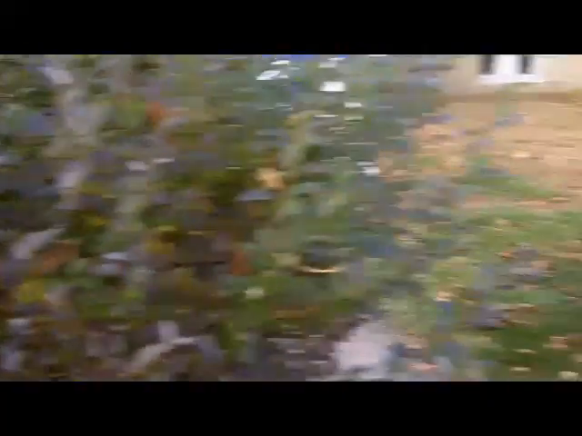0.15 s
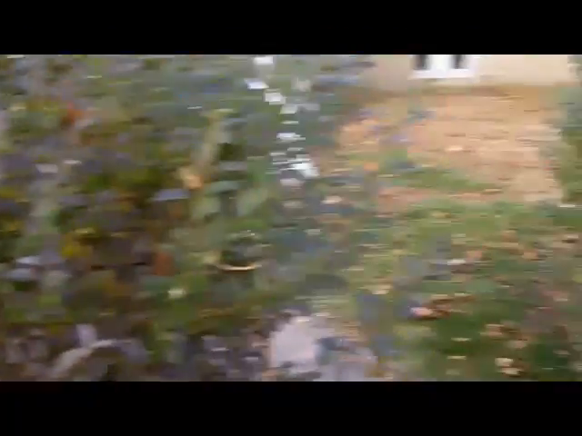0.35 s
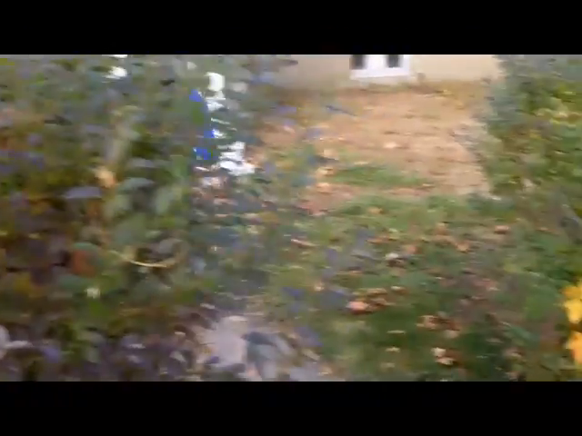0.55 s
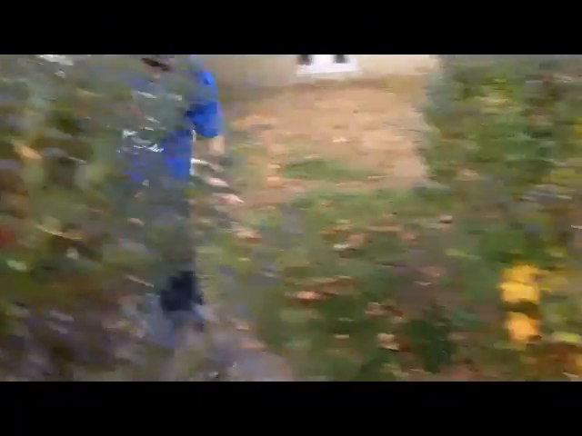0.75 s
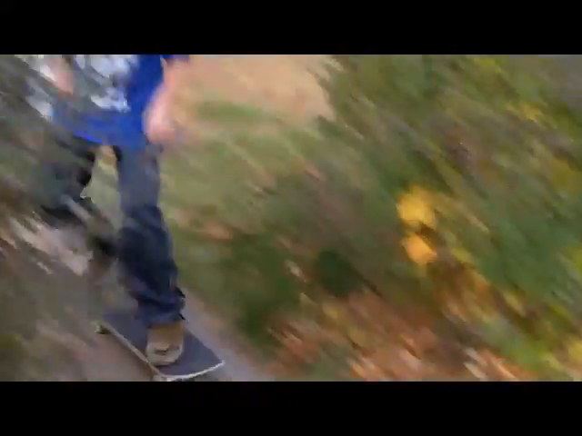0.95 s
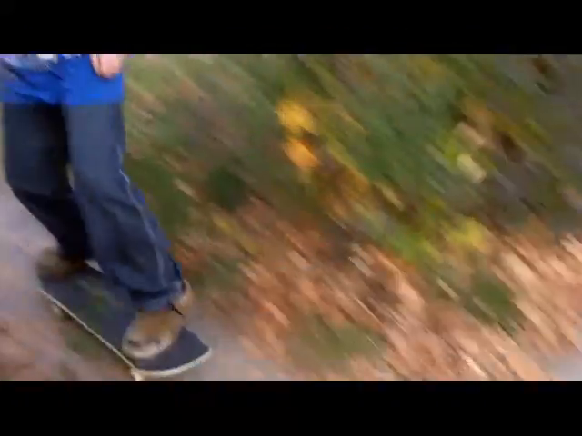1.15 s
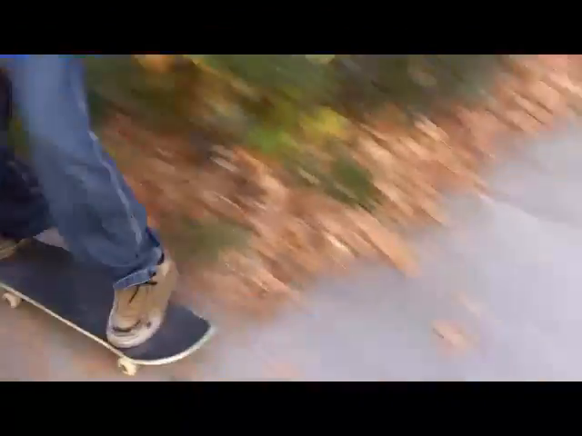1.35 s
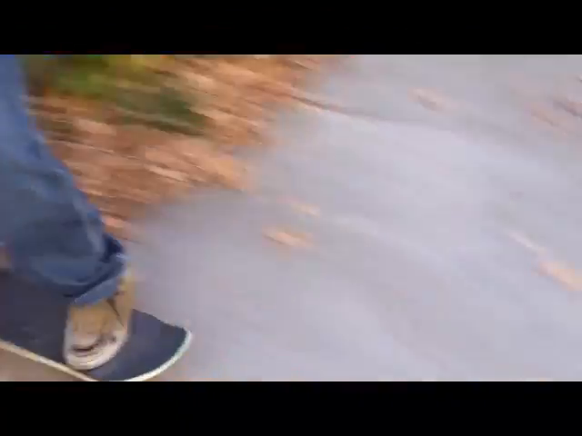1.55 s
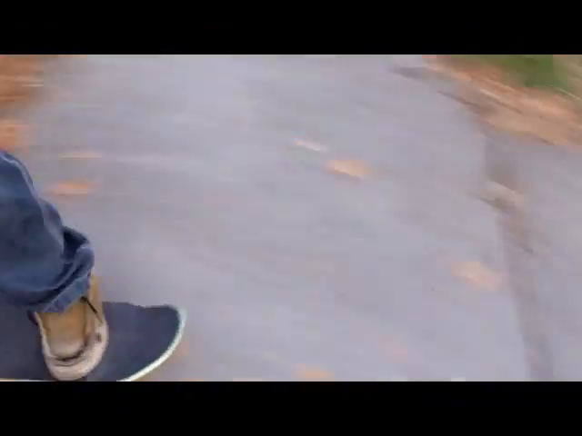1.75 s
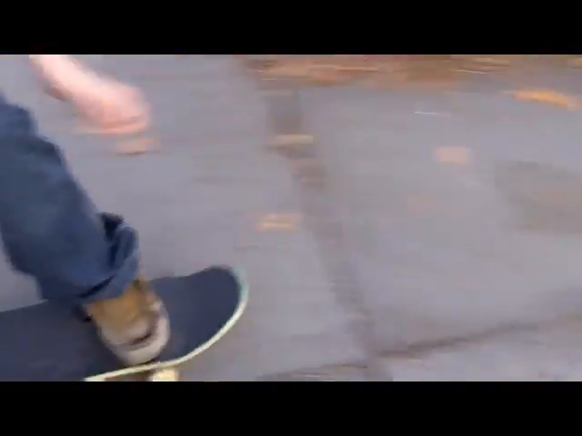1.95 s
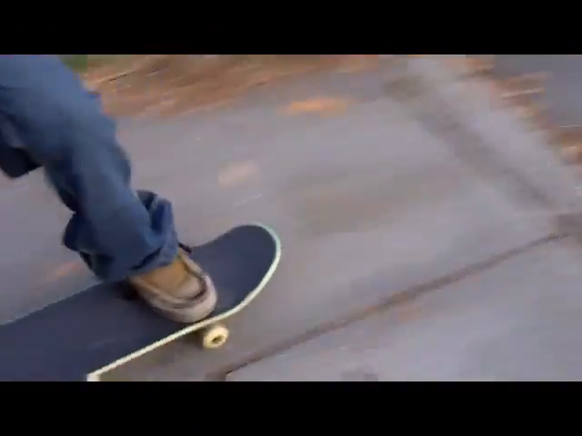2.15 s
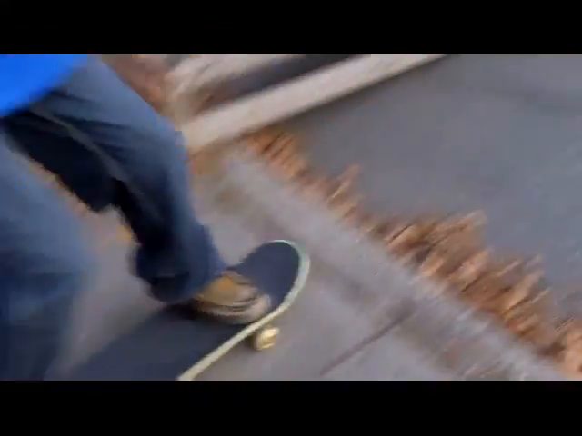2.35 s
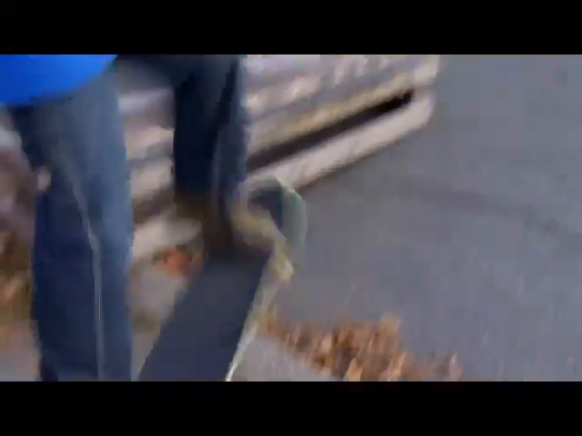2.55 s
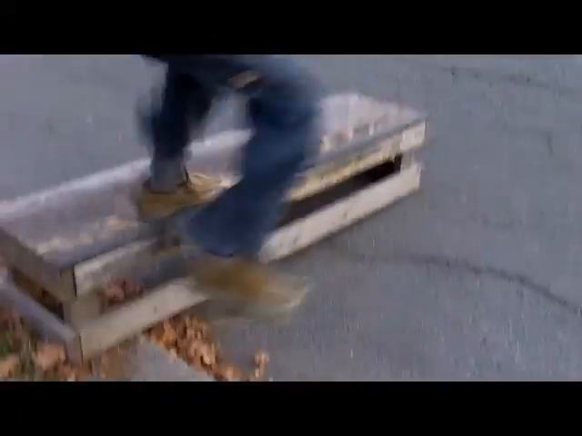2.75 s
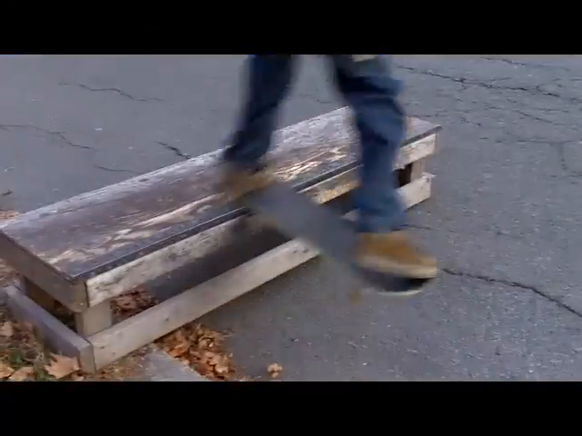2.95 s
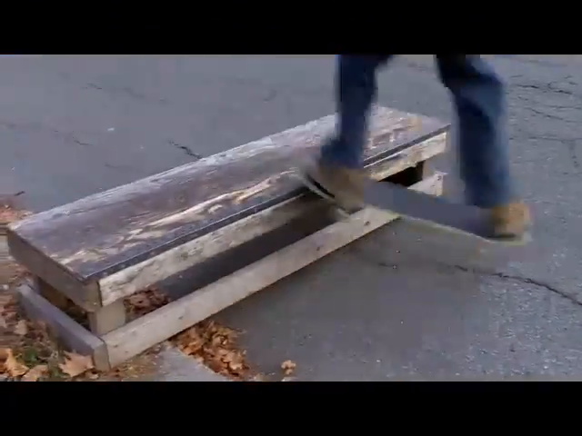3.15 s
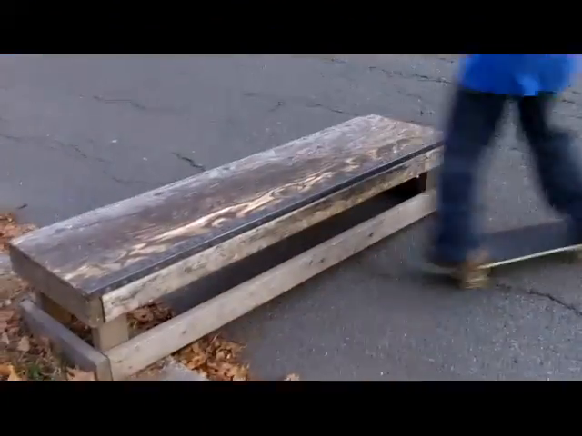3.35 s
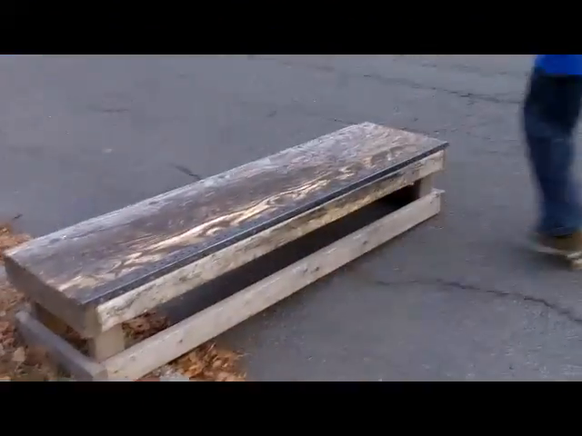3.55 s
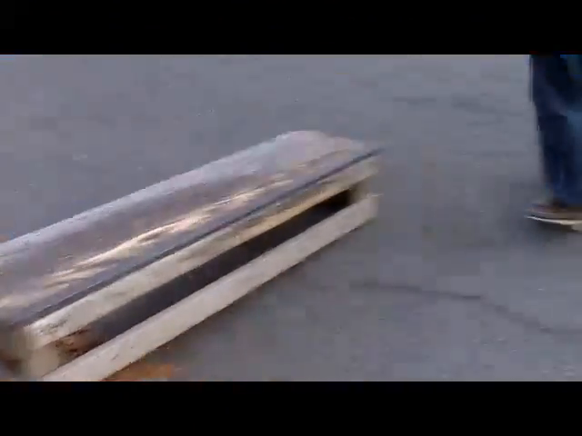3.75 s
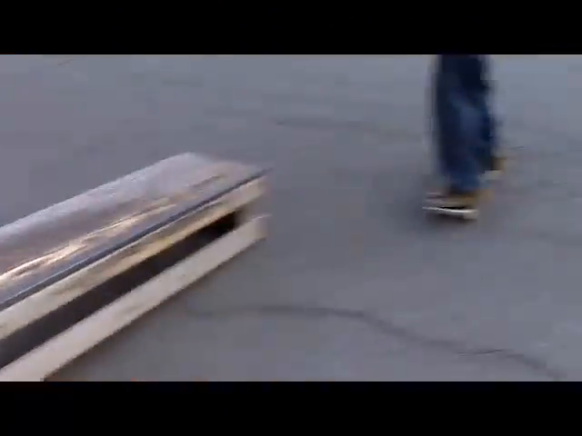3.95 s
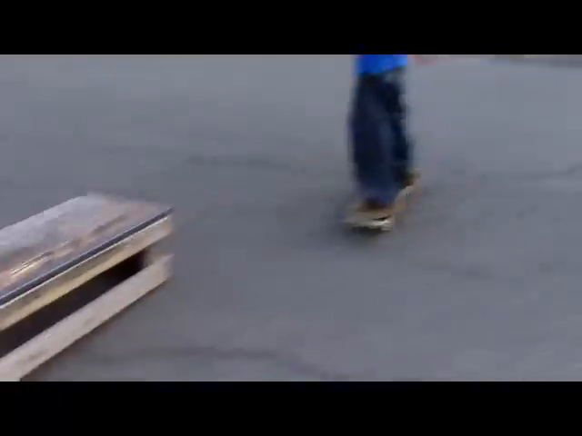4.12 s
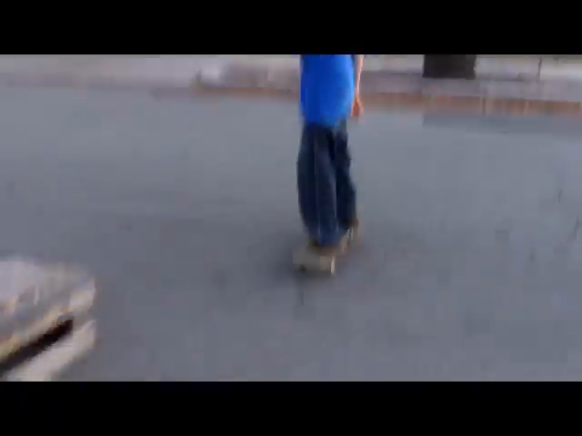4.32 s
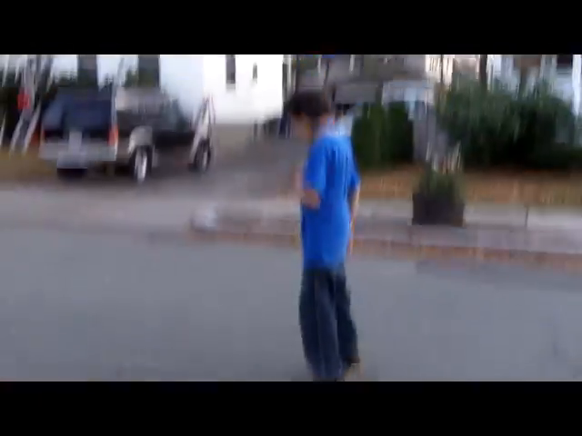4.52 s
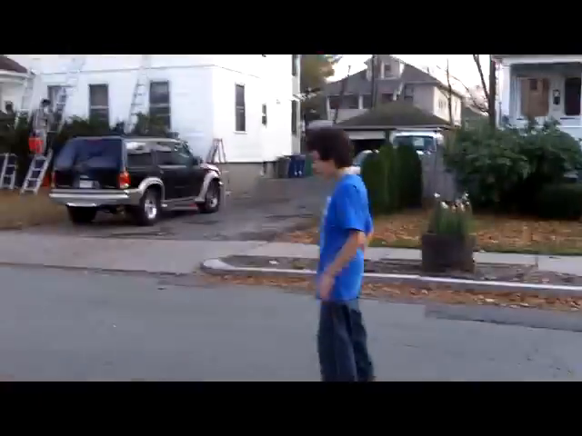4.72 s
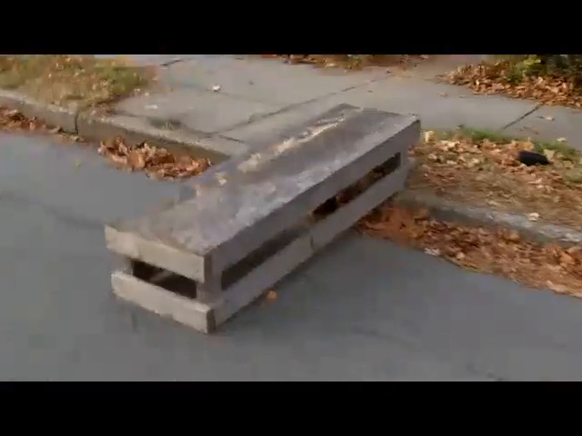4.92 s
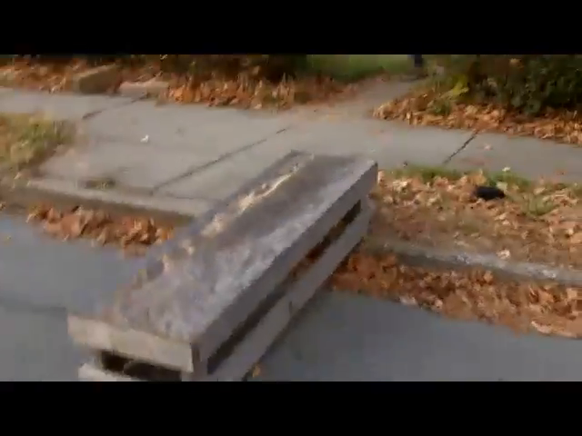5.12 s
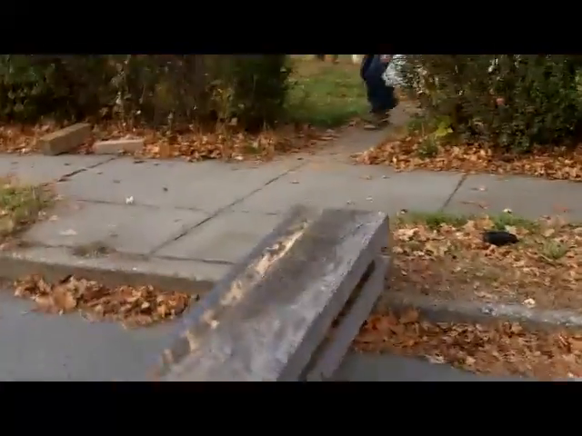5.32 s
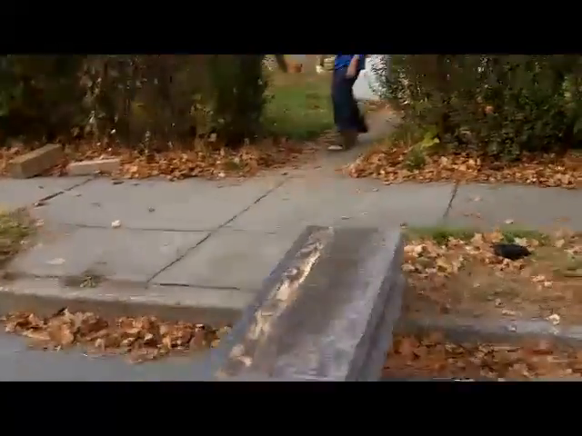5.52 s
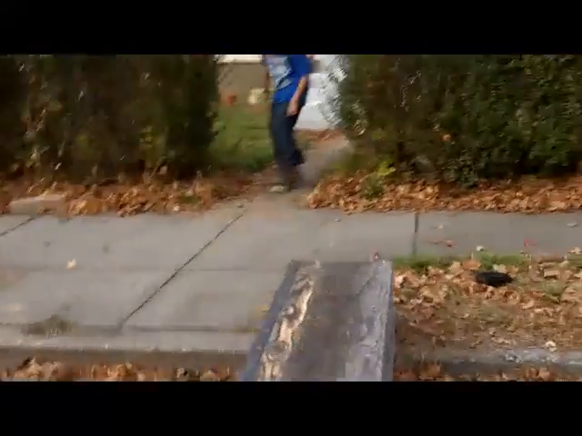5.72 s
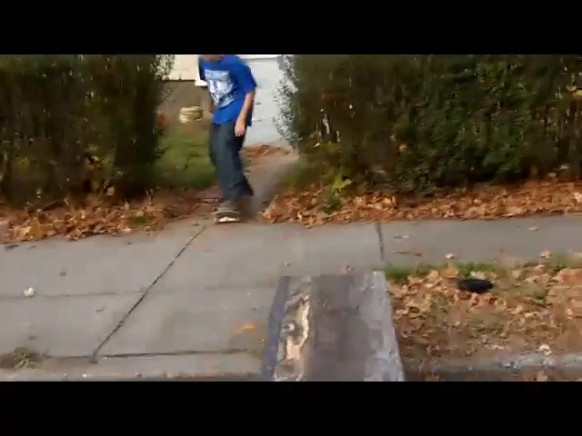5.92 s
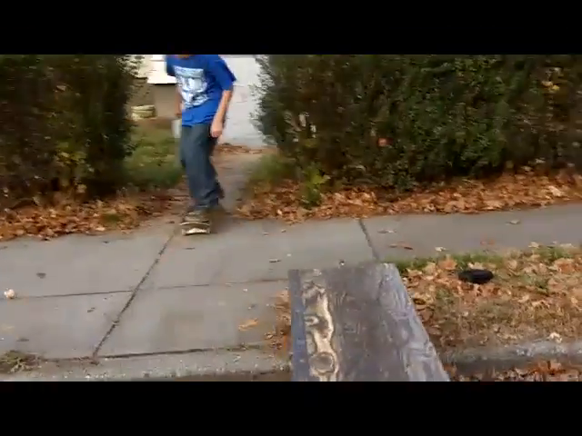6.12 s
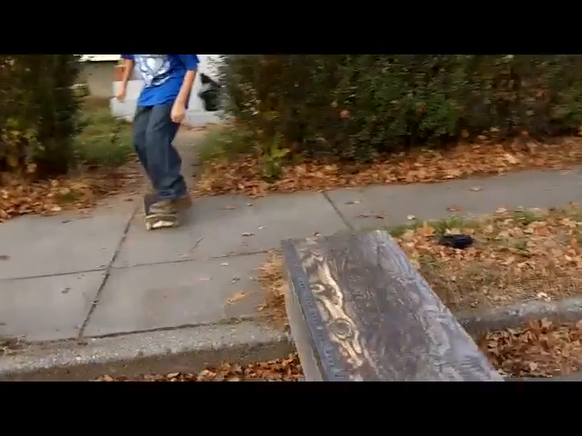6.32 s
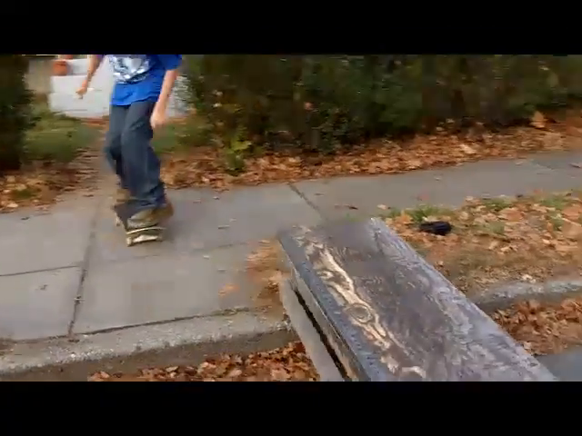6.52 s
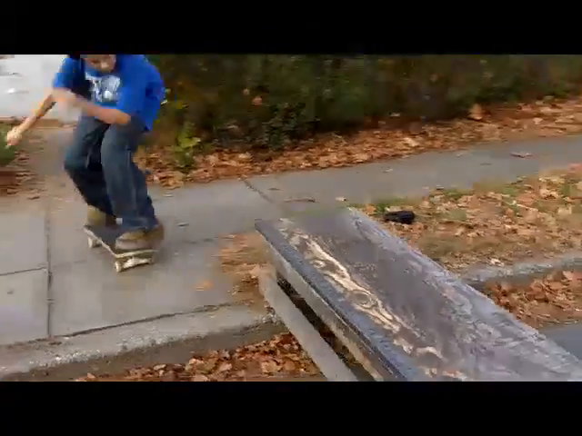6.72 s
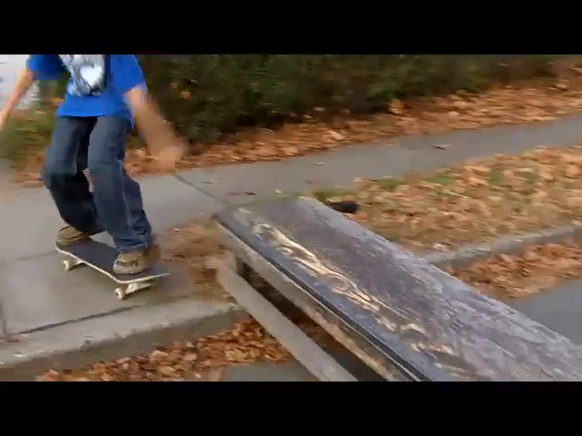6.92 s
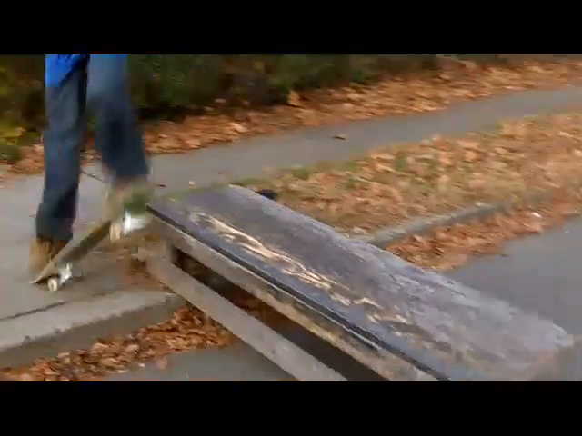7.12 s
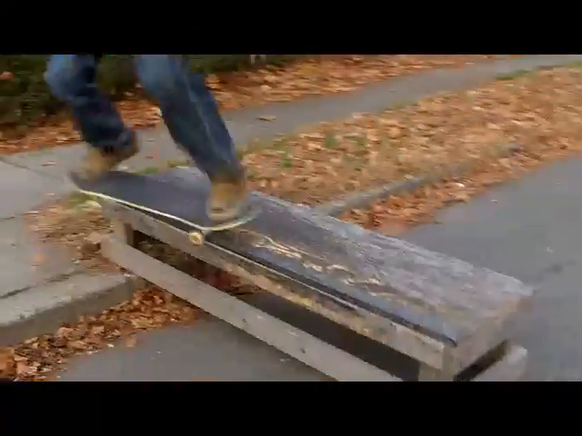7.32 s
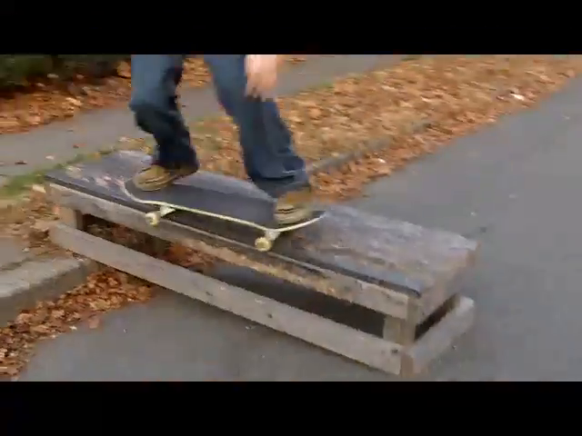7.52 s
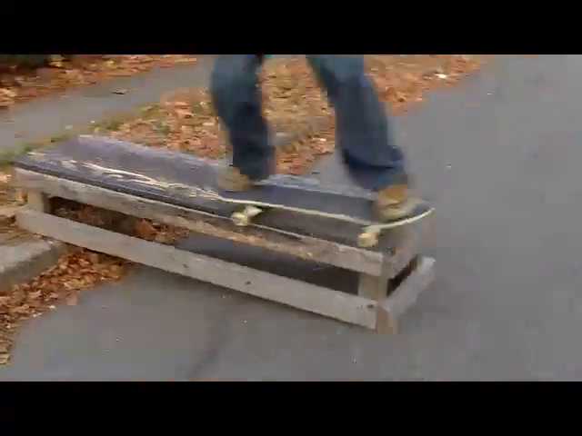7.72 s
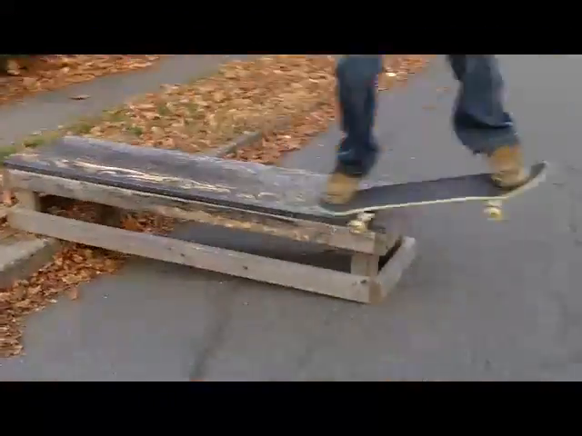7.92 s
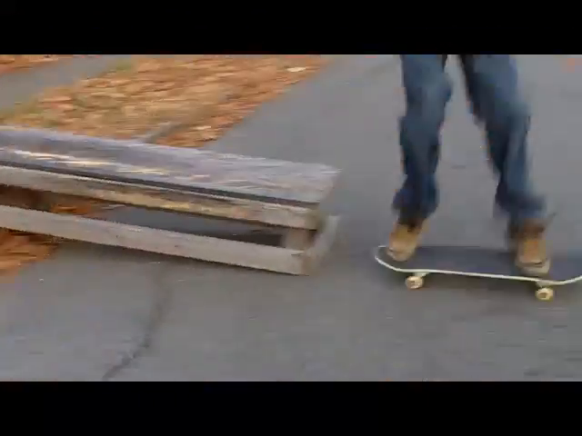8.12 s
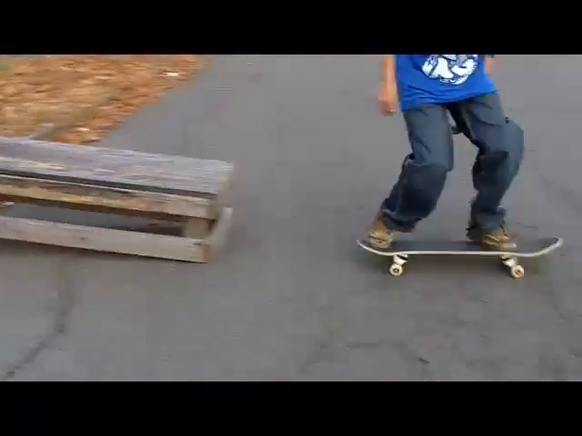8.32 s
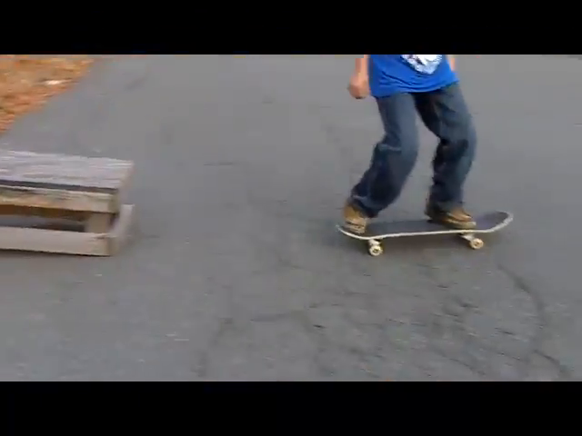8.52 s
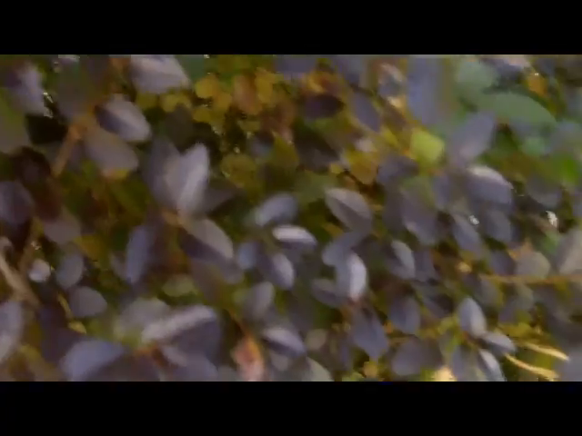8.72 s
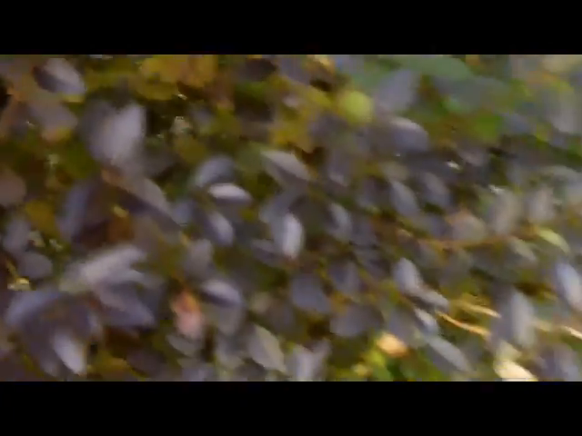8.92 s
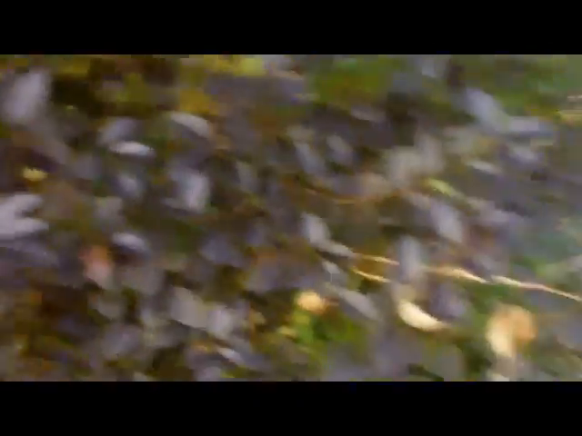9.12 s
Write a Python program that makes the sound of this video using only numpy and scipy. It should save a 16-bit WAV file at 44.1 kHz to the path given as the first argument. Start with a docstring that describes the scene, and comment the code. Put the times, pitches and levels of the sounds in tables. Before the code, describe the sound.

Skateboard rolls gritty over pavement with sharp clacks, pops and lands on asphalt; after silence it rolls back, slaps a wooden ledge, scrapes along, drops off.

```python
"""A skateboard rolls down a garden path, over pavement joints, pops off the kerb and lands on asphalt; after a
silence it rolls up again, hops onto a wooden ledge, rides along it and drops off; a third run is just begun.
Rolling is crushed grit coloured by the ground; blows ring the modes of deck, trucks and loose hardware.
Wheels scuff, squeal and rasp, a bearing whistles. Dull outdoor echoes, a quiet street and wind on the
microphone surround it."""
import sys
import numpy as np
from scipy import signal
from scipy.fft import rfft, irfft, next_fast_len
from scipy.io import wavfile
from scipy.ndimage import uniform_filter1d

SR = 44100
rng = np.random.default_rng(int(sys.argv[2]) if len(sys.argv) > 2 else 0)


def wrap_up_sound(samples):
    """Save the sound to the file named by the first command line argument, as 16-bit audio."""
    columns = np.atleast_2d(samples).T
    # keep every value between -1 and 1, then stretch to whole-number steps
    tamed = np.clip(columns, -1, 1)
    steps = np.round(tamed * 32767).astype(np.int16)
    wavfile.write(sys.argv[1], SR, steps)


N = 404397
TIME = np.arange(N) / SR
RING = np.arange(SR // 4) / SR  # time axis of one blow [s]

# Colour of the rolling on each kind of ground: (frequency [Hz], level [dB])
PATH = [(60, -21), (130, -8.5), (230, -7), (320, 1), (450, -9), (680, 0), (930, -8), (1280, -1), (1650, 4),
        (2050, -3), (2800, -14.5), (4000, -16.5), (6000, -17.5)]
# Paving slabs: (frequency [Hz], level [dB])
SLABS = [(60, -19), (130, -3), (230, 1.5), (320, -4), (450, -11), (680, -3), (930, -15), (1280, -11),
         (1650, -10), (2050, -13.5), (2800, -11), (4000, -12.5), (6000, -11)]
# Edge of the pavement: (frequency [Hz], level [dB])
KERB = [(60, -16), (130, -6), (240, -4), (430, -10), (540, -2), (730, 0), (950, -8), (1250, -7), (1850, -5),
        (2200, -9), (3300, -14), (6000, -13.5)]
# Asphalt: (frequency [Hz], level [dB])
ASPHALT = [(60, 6), (130, 0.5), (230, 1.5), (320, -2), (450, -12.5), (680, -3), (930, -10), (1280, -1),
           (1650, 0.5), (2050, -3), (2800, -12), (4000, -13), (6000, -13)]
# Garden ground at the start of the second run: (frequency [Hz], level [dB])
GARDEN = [(60, -17.5), (130, -1), (230, -1.5), (320, 1.5), (450, 0), (680, -2), (930, -6.5), (1200, -1.5),
          (1650, -7), (2050, -15.5), (2800, -17.5), (4000, -20), (6000, -22.5)]
# Ground on the way up to the ledge: (frequency [Hz], level [dB])
RUN_UP = [(60, -23), (130, 3.5), (230, 0.5), (320, -0.5), (450, 1.5), (680, 3.5), (930, -12), (1280, -4.5),
          (1650, -5.5), (2050, -15.5), (2800, -24), (4000, -28.5), (6000, -29.5)]
# Wooden ledge: (frequency [Hz], level [dB])
LEDGE = [(60, -14.5), (130, -1), (230, -3), (320, -1), (450, -4), (680, -2), (930, -11), (1280, -10),
         (1650, -9), (2050, -16), (2800, -17.5), (4000, -20), (6000, -18)]
# Road below the ledge: (frequency [Hz], level [dB])
ROAD = [(60, -15), (130, -2), (270, -2), (390, -7), (680, 0), (930, -10), (1300, -10), (1770, -11),
        (2570, -19), (4000, -21), (6000, -19)]

# Ways the board is struck, all with the columns (deck thud [dB], hollow knock [dB], truck clack [dB],
# chatter [s], deck pitch [factor], ring length [factor], truck note [Hz], truck note [dB],
# delay of second contact [s], second contact [dB re first]); thud, knock and clack levels precede strike()'s gains.
# A pair of wheels drops into a joint, the deck weighed down
JOINT = (-6, -1, -2, .0035, .72, 1.15, 1250, -8, .004, -7)
# A raised edge, hit squarely
SLAB_EDGE = (-15, -1, -13, .004, .75, .95, 1000, -16, .003, -13)
# A rounded hump gives a short, dead knock
BUMP = (-11, 0, -11, .002, .8, .55, 1250, -13, .006, -14)
# A stone or a hard tap rattles a truck
STONE = (-15, -13, -1, .004, .8, 1, 1800, -7, .006, -11)
# Tail and wheels slap down in quick turn; the freed deck rings on
POP = (-7.5, -3.5, -2, .003, 1.03, 2.1, 1630, -2, .0097, 2)
# One truck lands, then the other
LANDING = (-7, -2, -2, .006, .97, 1.1, 1330, -7, .0075, -4.5)
# The rider's full weight bends the deck
HEAVY_LANDING = (1, -5, -1.5, .004, 1, .9, 1200, -7, .0075, -5)
# The board comes down flat on the ledge's hard rim
LEDGE_SLAP = (-1, -10, -2, .0045, .55, 1.2, 1550, -5, .003, -11)
# A wheel snags or suddenly grips, and mostly the truck clacks
CATCH = (-20, -18, -2, .004, 1, 1.2, 1720, -2, .005, -8)

# Blows to the board: (time [s], strength [dB], crack of the contact [dB re strength], hollow knock [Hz], way)
KNOCKS = [(0.394, -29, -7, 630, STONE), (0.405, -25, -16, 685, STONE), (0.421, -30, -14, 700, STONE),
          (0.487, -24, -15, 700, STONE), (0.562, -26, -8, 780, STONE), (0.573, -26, -14, 720, STONE),
          (0.592, -25, -18, 775, STONE), (0.638, -27, -10, 720, STONE), (0.67, -28, -10, 720, STONE),
          (0.814, -12.5, -7.5, 760, JOINT), (0.83, -23, -15, 764, JOINT), (0.8711, -28, -8, 690, JOINT),
          (0.9637, -26, -5, 730, STONE), (1.223, -25, -13, 700, STONE), (1.3047, -17, -5.5, 700, JOINT),
          (1.412, -26, -6, 700, STONE), (1.444, -26, -11, 700, STONE), (1.5513, -19, -13, 610, STONE),
          (1.7163, -19, -1.5, 670, JOINT), (2.146, -30, -9, 580, STONE), (2.158, -26, -6, 700, STONE),
          (2.2165, -9.5, -11, 715, SLAB_EDGE), (2.343, -34, -10, 700, STONE),
          (2.4085, -9.5, -15, 690, SLAB_EDGE), (2.529, -26, -12, 700, STONE), (2.688, -27, -11, 700, STONE),
          (2.8284, -14.5, -8, 778, POP), (3.3277, -18.5, -2, 800, HEAVY_LANDING),
          (3.358, -32, -5, 790, STONE), (3.4245, -21.5, -8, 657, JOINT), (3.8684, -23, -11, 850, CATCH),
          (3.875, -17, -12, 680, CATCH), (4.0095, -28, -13, 706, STONE), (4.045, -31, -14, 700, STONE),
          (4.088, -33, -14, 700, STONE), (4.1467, -27, -20, 730, STONE), (4.173, -28, -16, 720, STONE),
          (4.306, -27, -20, 584, STONE), (4.346, -30, -10, 700, STONE), (4.401, -30, -7, 775, STONE),
          (4.601, -33, -12, 700, STONE), (5.287, -22, -20, 530, BUMP), (5.3164, -23, -12, 630, STONE),
          (5.451, -22, -22, 583, BUMP), (5.538, -26, -18, 650, STONE), (5.758, -28, -16, 650, STONE),
          (5.839, -26, -20, 620, BUMP), (6.155, -25, -20, 650, BUMP), (6.233, -24, -20, 600, BUMP),
          (6.3047, -21, -10, 640, STONE), (6.384, -25, -20, 650, BUMP), (6.468, -20.5, -20, 690, BUMP),
          (6.518, -25, -20, 600, BUMP), (6.642, -20, -25, 620, BUMP), (6.78, -22, -11, 616, CATCH),
          (6.789, -20, -14, 700, CATCH), (6.795, -25, -15, 700, JOINT), (6.812, -25, -20, 600, BUMP),
          (6.841, -24, -16, 680, BUMP), (6.951, -26, -16, 620, BUMP), (6.9795, -17, -16, 710, CATCH),
          (7.0202, -23.5, -24, 643, BUMP), (7.042, -25, -22, 640, BUMP), (7.218, -24, -22, 650, BUMP),
          (7.274, -19.5, -8, 500, CATCH), (7.4685, -23.5, 9, 660, LEDGE_SLAP), (7.501, -26, -9, 686, STONE),
          (7.551, -31, -5, 760, JOINT), (7.569, -38, -7, 700, STONE), (7.583, -38, -5, 700, STONE),
          (7.596, -42, 0, 700, STONE), (7.813, -31, -22, 590, BUMP), (7.991, -33, -5, 700, CATCH),
          (8.115, -31, -5, 700, CATCH), (8.131, -29, -20, 560, BUMP), (8.2702, -18, 2, 600, LANDING),
          (8.283, -21, -7, 580, BUMP), (8.292, -27, -5, 600, STONE), (9.075, -33, -12, 660, STONE)]
# Mean modes of wheels, trucks and tail: (frequency [Hz], level [dB], t60 [s])
TRUCKS = [(1100, -3, 0.021), (1213, 2.5, 0.017), (1440, -5, 0.077), (1587, 0.5, 0.034), (1757, 3, 0.048),
          (2000, 2.5, 0.027), (2248, 2.5, 0.02), (2660, -8, .025)]
# Mean modes of loose washers and bearings: (frequency [Hz], level [dB], t60 [s])
HARDWARE = [(3620, -7.5, .1), (4155, 5, 0.033), (4670, -10, .16), (4720, -5.5, 0.031), (5390, 0, 0.063),
            (6020, -11, .1), (6680, -7, .07)]
# Treble response of the microphone, with its notch: (frequency [Hz], level [dB])
MICROPHONE = [(6200, -2), (7000, -10.5), (7500, -17.5), (7950, -34.5), (8400, -21.5), (9500, -18.5),
              (12500, -23.5), (15000, -36.5)]
# Silences between the runs: (start [s], end [s])
CUTS = [(4.653, 5.177), (8.591, 8.977)]

DIP_ABOVE_DB = -24  # blows stronger than this make the rolling and the echoes dip


def undb(db):
    """Decibels to gain."""
    return 10 ** (np.asarray(db) / 20)


def unit(x):
    """Scale to rms 1."""
    return x / np.sqrt(np.mean(x ** 2) + 1e-18)


def blow(x, db):
    """Scale a blow so that its energy equals 20 ms at this level."""
    return x * undb(db) * np.sqrt(SR / 50 / np.sum(x ** 2))


def curve(table):
    """Join (time, level) points by straight lines."""
    return np.interp(TIME, *np.transpose(table))


def add(track, s, x):
    """Mix a sound into the track at time s."""
    start = max(int(s * SR), 0)
    track[start:start + len(x)] += x[:N - start]


def through(x, response):
    """Pass a sound through an impulse response."""
    return signal.fftconvolve(x, response)[:len(x)]


def colour(x, points, size=4096):
    """Minimum-phase filter of the given (Hz, dB) shape, made by folding its cepstrum into positive time."""
    hz, db = np.transpose(points)
    bins_hz = np.arange(size // 2 + 1) * SR / size
    shape = np.interp(np.log(bins_hz + 1), np.log(hz), db)
    cepstrum = irfft(np.log(undb(shape)))
    cepstrum[1:size // 2] *= 2
    cepstrum[size // 2 + 1:] = 0
    return through(x, irfft(np.exp(rfft(cepstrum))))


def band(x, lo_hz, hi_hz, order=4):
    """Butterworth band-pass."""
    return signal.sosfilt(signal.butter(order, [lo_hz, hi_hz], "band", fs=SR, output="sos"), x)


def walk(rate):
    """Smooth random wandering of rms 1, with this many random knots a second."""
    knots = rng.standard_normal(5000)
    path = np.interp(TIME * rate, np.arange(len(knots)), knots)
    return unit(uniform_filter1d(path, int(SR / rate / 2)))


def ring(modes, scatter_db=5.5, detune=0.017):
    """Decaying modes; each contact point weights and detunes them a little."""
    hz, db, t60 = np.transpose(modes)[:, :, None]
    pitch, weight, sign = rng.standard_normal((3, len(modes), 1))
    waves = np.sign(sign) * np.sin(2 * np.pi * hz * (1 + detune * pitch) * RING)
    decay = np.exp(-np.log(1000) * RING / t60)
    return np.sum(undb(db + scatter_db * weight) * waves * decay, axis=0)


def contact(chatter_s, share):
    """A push, then chatter of the parts against each other that builds quickly and dies."""
    envelope = np.exp(-RING / chatter_s) * (1 - np.exp(-RING / (0.13 * chatter_s)))
    push = share * rng.standard_normal(len(RING)) * envelope / np.sqrt(np.sum(envelope ** 2))
    push[0] += 1
    return push


def grit(rate, spread_db):
    """Grains crushed under the wheels, rate per second: many small ones, a few large."""
    size_db = spread_db * np.minimum(rng.exponential(size=N), 5)
    grains = rng.random(N) < rate / SR
    return unit(grains * undb(size_db) * rng.standard_normal(N))


def singing(modes, count=5):
    """Grit rings these modes; as the rider's weight shifts, different tunings come and go."""
    out = np.zeros(N)
    for _ in range(count):
        tuning = unit(through(grit(700, 2.5), ring(modes, detune=.06)))
        out += undb(4 * walk(9)) * tuning
    return unit(out)


def dips():
    """Decibels by which the rolling sinks after each hard blow before it swells back."""
    share, recovery_s = .5, .08
    db = np.zeros(N)
    for s, strength_db, *_ in KNOCKS:
        depth_db = share * max(strength_db - DIP_ABOVE_DB, 0)
        add(db, s, depth_db * np.exp(-TIME[:SR] / recovery_s))
    return db


def roll_gain():
    """Strength of the rolling as speed and distance change; each run has its own curve."""
    # Level before the dips, first run: (time [s], level [dB])
    first_run = [(0.37, -50.5), (0.39, -40), (0.545, -43), (0.6, -29.5), (0.9, -27), (1.5, -24.5),
                 (1.6, -30), (1.82, -30.5), (1.94, -27), (2.17, -29), (2.26, -34), (2.32, -35), (2.39, -31),
                 (2.44, -34), (2.6, -35.5), (2.74, -41), (2.83, -41), (2.93, -44), (3.0, -53), (3.3, -51),
                 (3.36, -37.5), (3.52, -37), (3.62, -29.5), (3.87, -28), (3.92, -37), (4.1, -32),
                 (4.6, -33.5)]
    # Second run, onto the ledge and off: (time [s], level [dB])
    second_run = [(5.17, -22.5), (5.5, -22.5), (5.62, -26), (5.9, -26), (6.08, -22.5), (6.42, -26.5),
                  (6.75, -23), (7.1, -29.5), (7.45, -30), (7.53, -35), (7.7, -38.5), (7.85, -33.5),
                  (8.12, -31), (8.35, -30), (8.59, -28.5)]
    # Last run: (time [s], level [dB])
    last_run = [(8.98, -39), (9.03, -49), (9.065, -54), (9.085, -32)]
    run = sum(TIME > start for start, _ in CUTS)
    db = np.choose(run, [curve(table) for table in (first_run, second_run, last_run)])
    return undb(db - dips())


def air(wind_gain_db=-2.7, gust_db=0.8, street_db=-48.5):
    """Wind buffets the microphone in low, gusting noise over the steadier noise of a quiet street."""
    # Wind strength before wind_gain_db and gusts: (time [s], level [dB])
    wind_curve = [(0, -32.5), (0.7, -37), (1.8, -44), (2.4, -42), (2.7, -47), (3.1, -52), (4.2, -36.5),
                  (4.6, -33), (5.3, -36), (5.8, -45), (6.4, -35), (7.05, -35), (7.2, -27), (7.45, -21.5),
                  (7.56, -48), (8.2, -35), (8.35, -43)]
    # Colour of the wind: (frequency [Hz], level [dB])
    wind_colour = [(12, -10), (25, -0.5), (55, -1.5), (100, -5), (180, -11.5), (400, -37.5), (1500, -58.5)]
    # Colour of the street: (frequency [Hz], level [dB])
    street_colour = [(60, -9), (250, 1), (450, -6.5), (750, -9), (1500, -11), (2500, -15), (6000, -15.5),
                     (14000, -13)]
    wind_db = curve(wind_curve) + wind_gain_db + gust_db * walk(7.4)
    wind = unit(colour(rng.standard_normal(N), wind_colour)) * undb(wind_db)
    street = unit(colour(rng.standard_normal(N), street_colour)) * undb(street_db + walk(3))
    return wind + street


def houses(x, echo_db=-28, delay_s=0.019, dull_hz=450, t60=.22):
    """Faint, dull scatter from hedges and house fronts: a decaying noise tail that fades in after a short gap."""
    t = TIME[:SR]
    fade_in = np.clip(t / delay_s - .5, 0, 1)
    tail = band(rng.standard_normal(SR), 120, dull_hz, order=1) * np.exp(-np.log(1000) * t / t60) * fade_in
    return undb(echo_db) * through(x, tail / np.sqrt(np.sum(tail ** 2)))


def squeals(rough_db=3):
    """Wheels squeal and a bearing whistles faintly, in short, unsteady tones."""
    # Squeals and whistles: (time [s], length [s], start pitch [Hz], end pitch [Hz], level [dB],
    # waver [share of pitch])
    tones = [(1.12, .12, 1400, 1330, -29, .035), (1.43, .12, 1470, 1400, -29, .03),
             (1.54, .04, 1830, 1810, -25, .01), (1.61, .2, 4250, 4000, -36, .06),
             (1.87, .14, 6450, 6600, -34, .035), (2.03, .11, 6700, 6350, -36, .035),
             (3.727, 0.038, 1920, 1940, -28.5, .018), (4.272, 0.1, 1965, 2060, -27.5, .008),
             (4.467, 0.085, 2040, 1960, -31, .014), (7.745, .055, 4280, 4000, -40, .03),
             (7.975, .035, 2000, 2060, -32, .02)]
    out, wobble = np.zeros(N), walk(200)
    roughness = unit(undb(rough_db * walk(150)))
    for s, length_s, start_hz, end_hz, db, waver in tones:
        on = (TIME >= s) & (TIME < s + length_s)
        progress = (TIME[on] - s) / length_s
        hz = (start_hz + (end_hz - start_hz) * progress) * (1 + waver * wobble[on])
        tone = np.sin(2 * np.pi * np.cumsum(hz) / SR)
        out[on] += undb(db) * np.sin(np.pi * progress) * roughness[on] * tone
    return out


def scrub(rasp_db=-2.5, ring_db=-8, drift=.05, catch_db=3.5):
    """Dense little slips rasp along the ledge, catching and letting go; their rings slide as the grip changes."""
    # Strength of the scrubbing: (time [s], level [dB])
    strength = [(7.56, -46), (7.68, -47), (7.725, -41), (7.78, -38), (7.83, -43), (7.9, -39), (7.965, -34),
                (7.995, -28), (8.015, -35), (8.07, -30), (8.115, -25), (8.13, -38), (8.17, -55)]
    # Colour of the rasp: (frequency [Hz], level [dB])
    rasp_colour = [(1200, -18), (2200, 4), (2900, -4), (3500, -6), (4200, -2.5), (5000, -12), (9000, -28)]
    # Mean pitches of the sliding rings, balance between them: (frequency [Hz], level [dB])
    ring_tones = [(1500, -2), (2250, 0), (2950, -5), (3500, -9), (4150, -7)]
    on = (TIME > strength[0][0]) & (TIME < strength[-1][0])
    rings = np.zeros(N)
    for hz, db in ring_tones:
        phase = 2 * np.pi * np.cumsum(hz * (1 + drift * walk(14))) / SR
        rings += undb(db) * walk(130) * np.sin(phase)
    rasp = unit(colour(grit(1500, 2.4), rasp_colour))
    catching = unit(undb(catch_db * walk(170)))
    return on * (undb(rasp_db) * rasp + undb(ring_db) * unit(rings)) * undb(curve(strength)) * catching


def scuffs(rate=2500, spread_db=2.2, ring_share=.15):
    """A wheel shoved sideways grinds over the grit in a short swell."""
    # Swells: (peak time [s], half length [s], level [dB], hiss [dB re the rasp])
    swells = [(0.48, .022, -22, -16), (0.587, .022, -22.5, -10), (0.65, .018, -24, -8),
              (0.703, .016, -24, -8), (0.79, .025, -23, -13), (1.122, .022, -23, -8),
              (2.533, .02, -25, -10), (2.69, .016, -23, -9), (2.772, .01, -33, -9), (2.81, .018, -33, 1),
              (3.283, .02, -31.5, -7), (3.42, .03, -31, -2), (3.595, .012, -29, -11),
              (3.665, .035, -26, -10), (3.845, .025, -29, -3), (5.255, .02, -24, -11),
              (5.655, .015, -24, -18), (5.93, .01, -26, -7), (6.725, .012, -24, -14),
              (7.125, .012, -30, -7)]
    # Colour of the rasp: (frequency [Hz], level [dB])
    rasp_colour = [(80, -14), (280, 2), (450, -5), (690, 3), (950, -3), (1300, 0), (1900, -1), (2800, -11),
                   (6000, -28)]
    slips = grit(rate, spread_db)
    rasp = unit(colour(slips + ring_share * singing(TRUCKS), rasp_colour))
    hiss = unit(band(slips, 2800, 9000, order=2))
    out = np.zeros(N)
    for s, half_s, db, hiss_db in swells:
        on = np.abs(TIME - s) < 3 * half_s
        swell = np.exp(-((TIME[on] - s) / half_s) ** 2)
        out[on] += undb(db) * swell * (rasp[on] + undb(hiss_db) * hiss[on])
    return out


def jingles(chatter_s=0.022, tick_db=0, count=7):
    """Several loose metal parts chatter and ring briefly."""
    # Jingles of the hardware: (time [s], level [dB])
    moments = [(0.039, -35), (.073, -41), (.14, -42), (.204, -32), (.26, -45), (1.641, -33), (4.048, -33),
               (4.204, -29), (4.41, -35), (8.978, -46.5), (8.998, -41)]
    out = np.zeros(N)
    for s, db in moments:
        metal = np.zeros(len(RING))
        for _ in range(count):
            metal += through(contact(chatter_s, 1.5), ring(HARDWARE, detune=0.06) * np.exp(-RING / .012))
        ticks = band(contact(chatter_s, 5.5), 3300, 12000, order=2)
        add(out, s, blow(metal, db) + blow(ticks, db + tick_db))
    return out


def woody(hz, ring_length, lower_ratio=.77, lower_db=-3, upper_t60=.028, lower_t60=.02, rise_s=.0004):
    """The note of a knock: two close modes start against each other, so it swells briefly and rings out clean."""
    decay = np.log(1000) * RING / ring_length  # ring_length stretches both t60s
    upper = np.sin(2 * np.pi * hz * RING) * np.exp(-decay / upper_t60)
    lower = np.sin(2 * np.pi * lower_ratio * hz * RING) * np.exp(-decay / lower_t60)
    return (upper - undb(lower_db) * lower) * (1 - np.exp(-RING / rise_s))


def strike(db, crack_db, hollow_hz, way, thud_gain_db=1, hollow_gain_db=0.5, clack_gain_db=1, crack_gain_db=6.5,
           metal_db=-6, loud_db=-20, splatter_db=4.5, rattle_db=-4, rattle_s=.011):
    """The deck thuds, the gap below it knocks, the trucks clack and ring, the contact cracks and rattles out."""
    # Mean bending modes of the wooden deck: (frequency [Hz], level [dB], t60 [s]), scaled by the way of striking
    deck_modes = [(129, -16.5, .08), (172, -12, 0.063), (236, -4.5, 0.04), (284, 2, 0.065),
                  (335, -4.5, 0.046)]
    # Colour of a hard contact on concrete: (frequency [Hz], level [dB])
    crack_colour = [(300, -11.5), (900, 0), (2000, -3.5), (3000, -5.5), (4200, -10), (6000, -6.5),
                    (14000, -12)]
    thud_db, hollow_db, clack_db, chatter_s, deck_pitch, ring_length, note_hz, note_db = way[:8]
    note_length = np.sqrt(ring_length)

    deck = ring(np.array(deck_modes) * [deck_pitch, 1, ring_length], scatter_db=2)
    thud = band(through(contact(chatter_s, 0.22), deck), 95, 4000, order=2)
    hollow = through(contact(chatter_s, 0.06), woody(hollow_hz, note_length))
    clack = through(contact(chatter_s, 1.0), ring(TRUCKS, detune=.04) * np.exp(-RING / .012))
    note = through(contact(chatter_s, .4), woody(note_hz, note_length, lower_db=-9))
    body = blow(thud, thud_db + thud_gain_db) + blow(hollow, hollow_db + hollow_gain_db)
    body += blow(clack, clack_db + clack_gain_db) + blow(note, note_db)

    crack = colour(contact(chatter_s, 5), crack_colour)
    rattle = colour(contact(rattle_s, 9), crack_colour)
    metal = ring(HARDWARE, detune=.04) * np.exp(-RING / 0.0077)
    # the loudest blows overload and splatter: the top octave grows faster than the rest, up to a limit
    splatter = band(contact(chatter_s, 5), 12000, 16500, order=3)
    splatter_boost_db = min(2 * (db + crack_db - loud_db), 6)
    edge = blow(crack, crack_gain_db) + blow(rattle, rattle_db) + blow(metal, metal_db)
    edge += blow(splatter, splatter_db + splatter_boost_db)
    return undb(db) * (body + undb(crack_db) * edge)


def pebbles(tick_db=-13, crack_db=-8, spread_db=2.5, knock_hz=700, count=60):
    """Small stones tick under the wheels at random, following the strength of the rolling."""
    out = np.zeros(N)
    for place, size in rng.random((count, 2)):
        level_db = tick_db + spread_db * (2 * size - 1)
        # struck as hard as DIP_ABOVE_DB for its timbre, then brought to its level
        tick = strike(DIP_ABOVE_DB, crack_db, knock_hz, STONE) * undb(level_db - DIP_ABOVE_DB)
        add(out, place * TIME[-1], tick)
    return out * roll_gain()


def knocks():
    """Joints, stones, pops and landings; each blow has a second contact a moment later."""
    out = np.zeros(N)
    for s, db, crack_db, hollow_hz, way in KNOCKS:
        lag_s, second_db = way[-2:]
        add(out, s, strike(db, crack_db, hollow_hz, way))
        add(out, s + lag_s, strike(db + second_db, crack_db, hollow_hz, way))
    return out


def crunches(rate=220, spread_db=1.4, decay_s=.003, ring_share=.6):
    """Coarse grains burst under the wheels, each rattling the trucks for a few milliseconds."""
    burst = np.exp(-RING / decay_s) * (1 - np.exp(-4 * RING / decay_s))
    bursts = through(np.abs(grit(rate, spread_db)), burst)
    return unit(bursts * (rng.standard_normal(N) + ring_share * singing(TRUCKS)))


def patchy(x, depth_db, rate):
    """The ground changes under the wheels: each third of an octave swells and fades by itself, least in the roar."""
    size = next_fast_len(N)
    bins_hz = np.arange(size // 2 + 1) * SR / size
    place = 3 * np.log2(np.maximum(bins_hz, 400) / 400)  # thirds of an octave above 400 Hz
    spectrum = rfft(x, size)
    out = np.zeros(N)
    for k in range(17):
        part = irfft(spectrum * np.maximum(1 - np.abs(place - k), 0), size)[:N]
        out += part * undb(depth_db * min((k + 1) / 6, 1) * walk(rate))
    return out


def rolling(roar_gain_db=1.5, clatter_gain_db=-1.5, hiss_gain_db=1.2, bump_db=2.1, flutter_db=0.8, sand=0.7,
            ring_share=0.33, rattle_share=.12, deck_follow=.4, tick_share=.55):
    """Grit shakes the board; uneven ground loads and unloads the wheels, which the heavy deck evens out."""
    # The ground sets colour and balance: (start [s], ground colour, deck roar [dB], truck clatter [dB],
    # grit hiss [dB], coarse grit [share]); levels before the gains and the strength of the rolling
    stretches = [(0, PATH, -4.5, -2.5, -11, .8), (.82, SLABS, -4, -3, -9.5, .8),
                 (1.56, SLABS, -1, -6.5, -7, .65), (2.13, KERB, -2.5, -5, -7.8, .55),
                 (2.95, ASPHALT, -3, -4, -8, .6), (3.58, ASPHALT, -8, -1, -8.5, .75),
                 (3.9, ASPHALT, -3, -4.5, -7.5, .6), (4.9, GARDEN, -.3, -5.5, -15.5, .5),
                 (5.57, RUN_UP, -.8, -6.5, -15, .25), (7.47, LEDGE, -1, -5, -14, .2),
                 (8.27, ROAD, -1.5, -5.5, -11.5, .3), (8.8, PATH, -5.5, -2, -12, .4)]
    starts = [row[0] for row in stretches]
    load = unit(undb(bump_db * walk(55)))
    coarse = np.array([row[-1] for row in stretches])[np.searchsorted(starts[1:], TIME)]

    shake = grit(rate=1400, spread_db=2.5) + sand * rng.standard_normal(N) + coarse * crunches()
    ticks = unit(band(grit(rate=110, spread_db=3), 1800, 14000, order=2))  # single grains crack
    shake = (shake + tick_share * coarse * ticks) / np.sqrt(1 + sand ** 2 + coarse ** 2)
    shake = shake + ring_share * singing(TRUCKS) + rattle_share * singing(HARDWARE)
    shake = patchy(shake, depth_db=1.9, rate=11)

    # deck roar, truck clatter, grit hiss: (low edge [Hz], high edge [Hz], gain [dB])
    parts = [(60, 1010, roar_gain_db), (950, 2480, clatter_gain_db), (2800, 16000, hiss_gain_db)]
    loads = [unit(load ** deck_follow), load, load]
    gains = [weight * undb(db + flutter_db * walk(28)) for weight, (_, _, db) in zip(loads, parts)]
    out = np.zeros(N)
    for (start, ground, *balance_db, _), end in zip(stretches, starts[1:] + [np.inf]):
        on = (TIME >= start) & (TIME < end)
        sound = colour(shake[on], ground)
        for (lo_hz, hi_hz, _), gain, db in zip(parts, gains, balance_db):
            part = band(sound, lo_hz, hi_hz)
            # each part is levelled by its strength after the microphone's treble response
            out[on] += undb(db) * gain[on] * part / colour(part, MICROPHONE).std()
    return out * roll_gain()


def scene():
    """The board and its surroundings, alike in both channels; the echoes dip with the rolling."""
    board = rolling() + knocks() + pebbles() + scuffs() + jingles() + squeals() + scrub()
    echoes = houses(board) * undb(-dips())
    return np.tile(board + echoes + air(), (2, 1))


def record(dry):
    """The microphone notches the treble and clips peaks; silences hold only soft thumps; the top is cut."""
    # Level steps up and back, a soft thump at each edge: (start [s], end [s])
    steps = [(4.803, 5.003), (8.591, 8.803)]
    step_db, top_hz = -42, 15400
    sound = np.clip([colour(channel, MICROPHONE) for channel in dry], -1, 1)
    for start, end in CUTS:
        sound = sound * ((TIME < start) | (TIME >= end))
    for start, end in steps:
        raised = 1. * ((TIME > start) & (TIME < end))
        sound = sound + undb(step_db) * uniform_filter1d(raised, size=7)
    return signal.sosfilt(signal.ellip(8, .2, 85, top_hz, fs=SR, output="sos"), sound)


dry = scene()
out = record(dry)
wrap_up_sound(out)
```